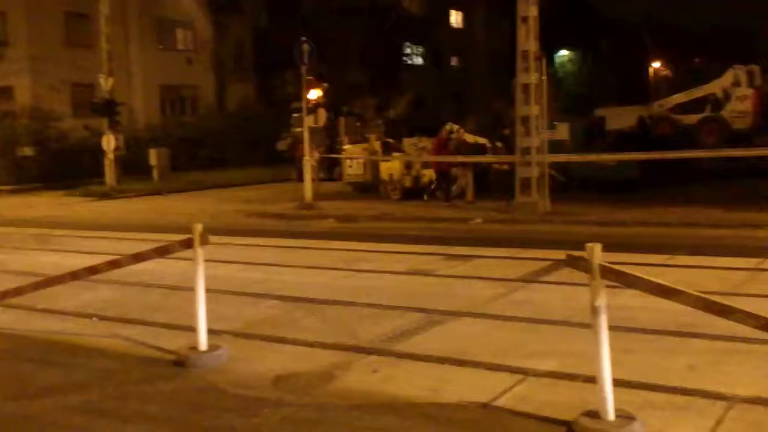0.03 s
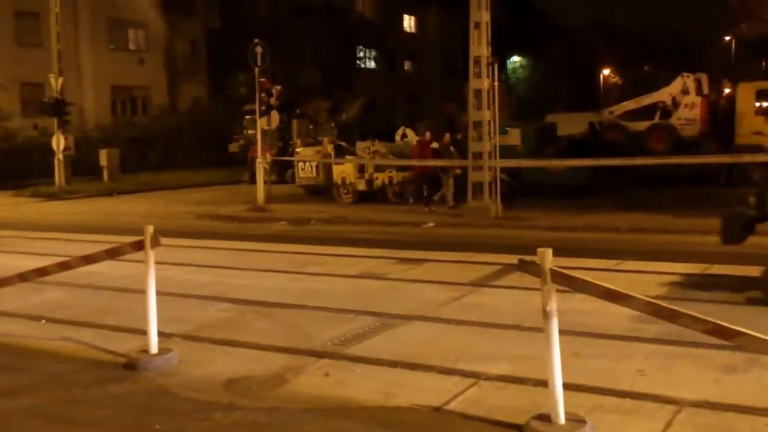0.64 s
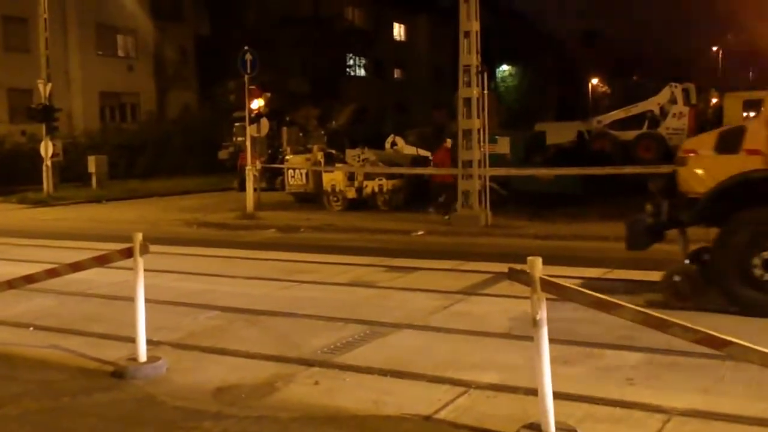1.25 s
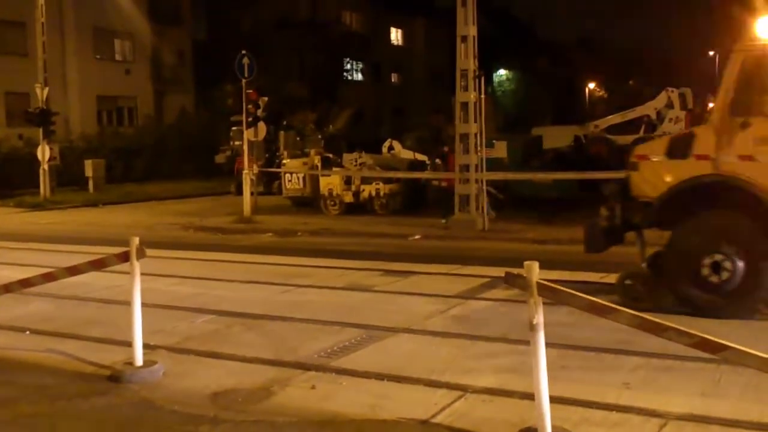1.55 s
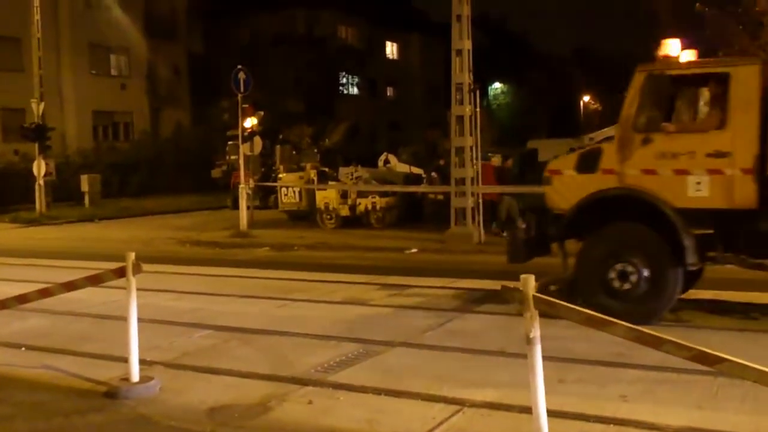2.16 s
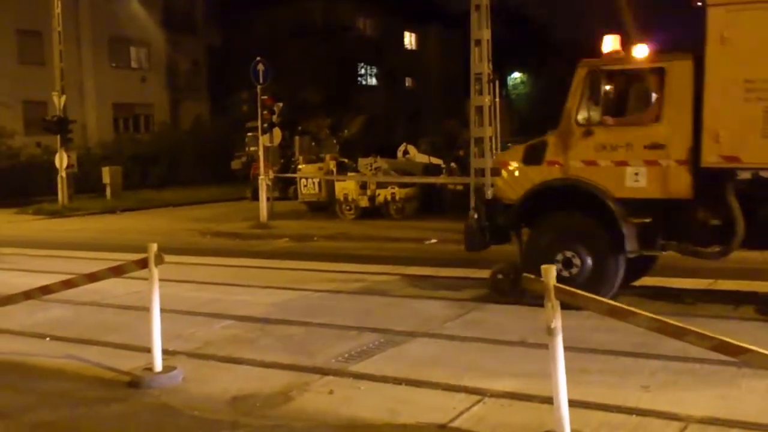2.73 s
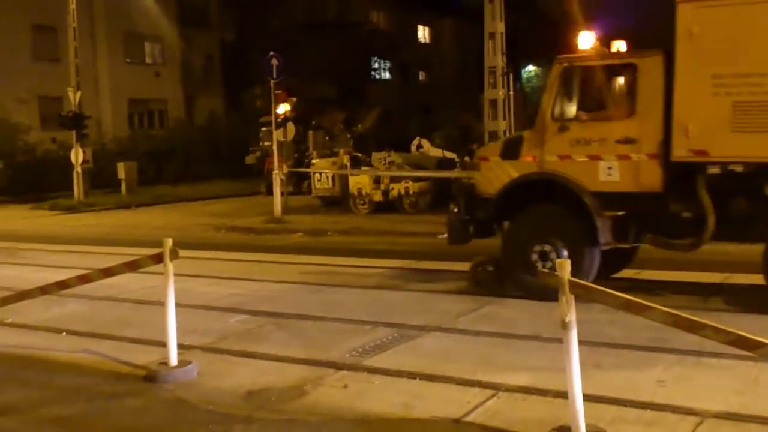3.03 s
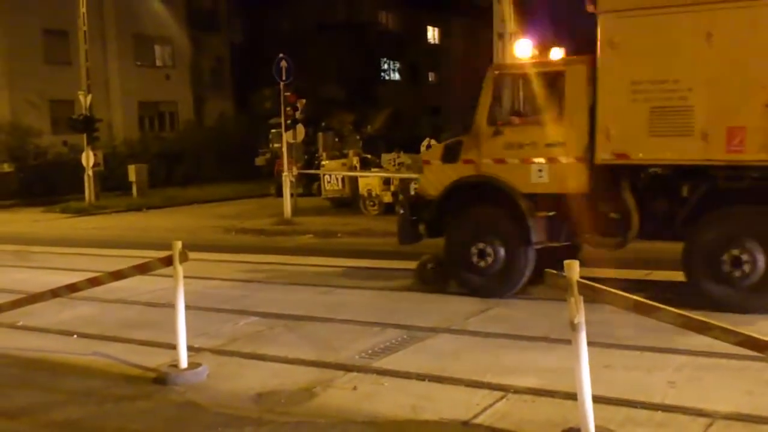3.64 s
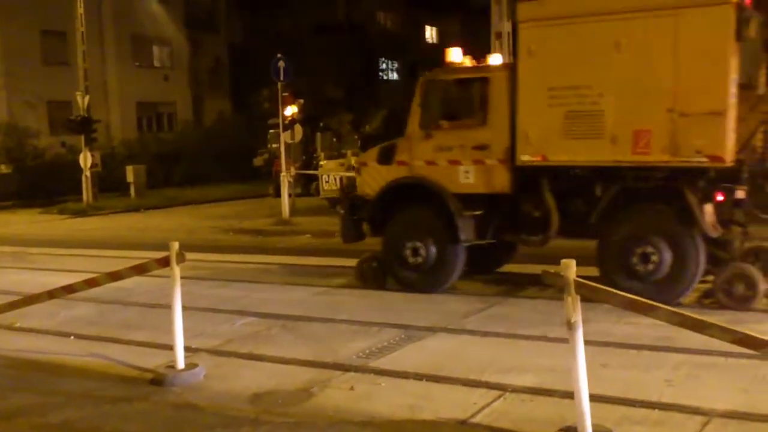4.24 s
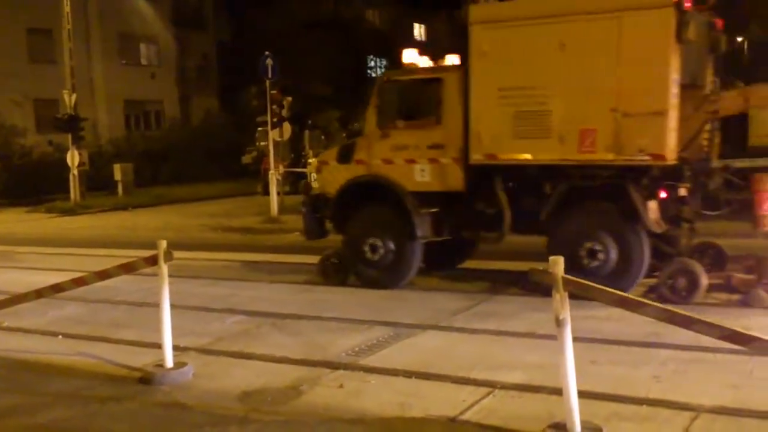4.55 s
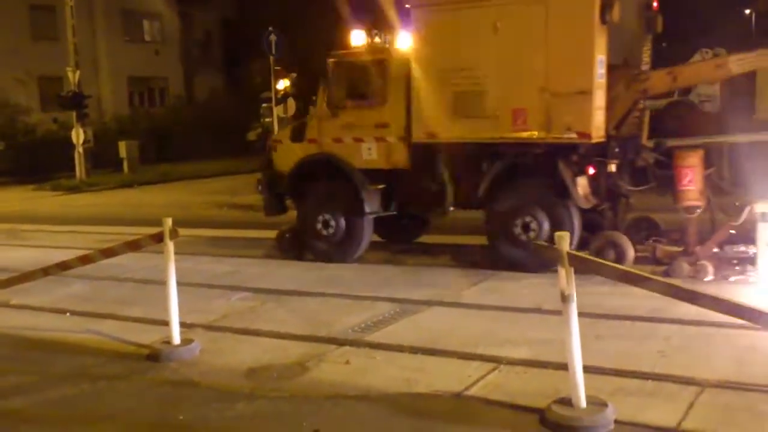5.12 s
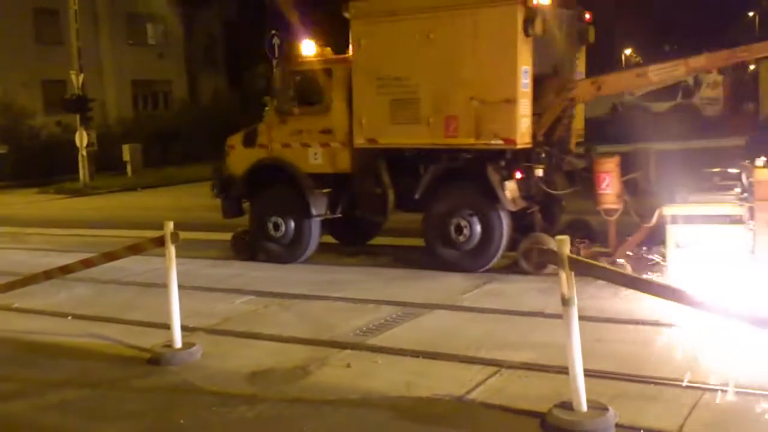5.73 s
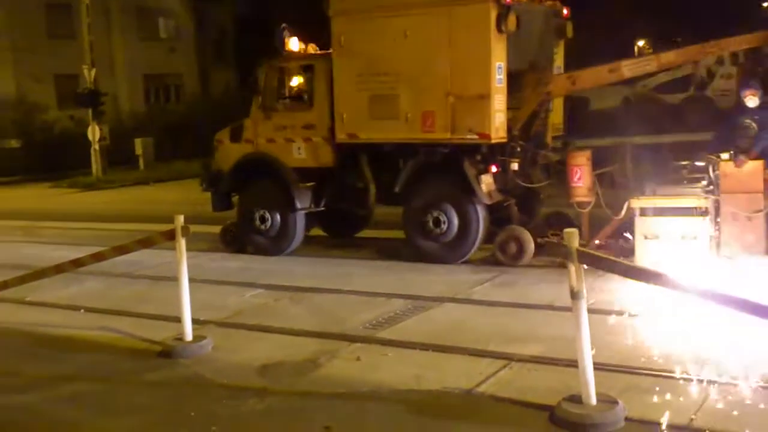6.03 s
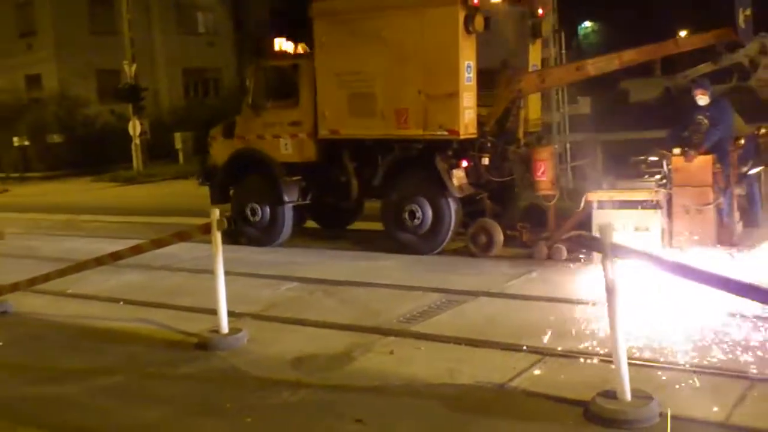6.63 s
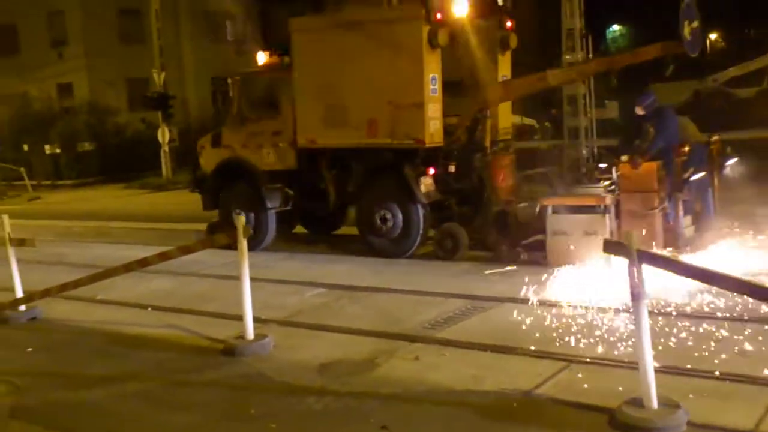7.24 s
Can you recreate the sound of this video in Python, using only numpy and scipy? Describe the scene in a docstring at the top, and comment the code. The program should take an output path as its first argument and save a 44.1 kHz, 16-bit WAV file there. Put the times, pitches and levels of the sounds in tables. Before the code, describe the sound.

Steady rail grinding with a gritty rasp, spark hiss, machine drone and brief squeals over a rumbling diesel truck and generator.

```python
"""Rail grinder on a night street

A diesel truck crawls along a tram line, towing a rail grinder that comes nearer from the right.
The truck and a generator throb. The grinder's spindles (spinning shafts) drone, their gears whine,
and their stones hiss and squeal on the rail. The sound cuts in at once, heard through two closely
spaced microphone ports (openings)."""
import sys
import numpy as np
from scipy import signal
from scipy.fft import rfft, irfft, next_fast_len
from scipy.io import wavfile
from scipy.ndimage import uniform_filter1d, map_coordinates

SR = 44100
rng = np.random.default_rng(int(sys.argv[2]) if len(sys.argv) > 2 else 0)


def persist_wave(psi):
    """Save psi, clipped to +-1, as 16-bit WAV."""
    counts = np.round(np.clip(psi, -1, 1) * 32767).astype(np.int16)
    wavfile.write(sys.argv[1], SR, np.atleast_2d(counts).T)


N = 321048


def amp(db):
    """Turn decibels into a gain to multiply by."""
    return 10 ** (np.asarray(db) / 20)


def unit(x):
    """Scale a signal so that its average power is 1."""
    return x / np.sqrt(np.mean(np.abs(x) ** 2) + 1e-20)


def along(points, hz):
    """Read between (frequency, value) points, giving every octave equal room."""
    freqs, values = np.transpose(points)
    return np.interp(np.log(hz + 1), np.log(freqs + 1), values)


def clock():
    """The time of each sample in seconds."""
    return np.arange(N) / SR


def curve(points):
    """Join (time, value) points with straight lines, one value per sample."""
    times, values = np.transpose(points)
    return np.interp(clock(), times, values)


def wobble(rate):
    """A smooth curve through `rate` random values a second."""
    knots = rng.standard_normal(4096)
    coarse_times = np.arange(0, N + 64, 64) / SR
    return np.interp(clock(), coarse_times, map_coordinates(knots, [coarse_times * rate], mode="wrap"))


def swell(peak_s, length_s, db):
    """A gain that rises to db at peak_s and dies away again, lasting length_s in all."""
    return amp(db) * np.cos(np.pi * np.clip((clock() - peak_s) / length_s, -.5, .5))


def filtered(x, response):
    """Multiply each frequency in x by the gain that response(hz) gives."""
    size = next_fast_len(N + 8192)
    return irfft(rfft(x, size) * response(np.fft.rfftfreq(size, 1 / SR)), size)[..., :N]


def angle(hz):
    """The growing angle of something that turns hz times a second."""
    return 2 * np.pi * np.cumsum(hz * np.ones(N)) / SR


def tone(phase, db):
    """A sine wave at level db, starting anywhere in its cycle."""
    return np.sqrt(2) * amp(db) * np.sin(phase + 2 * np.pi * rng.random())


def rush(spectrum, patchy_db):
    """Stereo noise of power 1 with drifting loud and soft patches; the ports agree less in the treble."""
    # how alike the two ports sound: f/Hz, likeness/0-1
    likeness = [(200, 0.98), (750, 1), (1250, 0.63), (2300, 0.57), (3300, 0.63), (7000, 0.09), (10000, 0.4),
                (14000, 0)]
    noise_grid = signal.stft(rng.standard_normal((2, N)), nperseg=1024)[2]
    patches = uniform_filter1d(rng.standard_normal(noise_grid.shape[1:]), size=4, axis=0)  # over pitch
    patches = uniform_filter1d(patches, size=24, axis=1)  # over time
    pair = signal.istft(noise_grid * amp(patchy_db * unit(patches)), nperseg=1024)[1][:, :N]
    spread = lambda hz: np.arccos(np.clip(along(likeness, hz), 0, 1)) / 2
    shares = lambda hz: [np.cos(spread(hz)), np.sin(spread(hz))]
    mid, side = filtered(pair, lambda hz: amp(along(spectrum, hz)) * shares(hz))
    return unit(np.array([mid + side, mid - side]))


def bearing():
    """The grinder's angle to the right of straight ahead as it rolls along a straight track."""
    speed_m_per_s, track_distance_m, straight_ahead_s = 1.23, 7.02, 7.97
    return np.arctan(speed_m_per_s * (straight_ahead_s - clock()) / track_distance_m)


def approaching(closest_db, growth):
    """A level that moves towards closest_db as the grinder nears: up if growth is positive, else down."""
    nearness_db = 20 * np.log10(np.cos(bearing()))
    return closest_db + growth * nearness_db


def arriving(pair, lag_ms):
    """Sound from the right reaches the left port a little later."""
    lag = lag_ms * SR / 1000
    return np.array([map_coordinates(pair[0], [np.arange(N) - lag], order=5), pair[1]])


def street_echoes(x, path_m, shrink_m_per_s, echo_db):
    """The truck's side and the paving return four weak echoes, whose paths slowly shorten."""
    mix = x.copy()
    for path_share, shrink_share in rng.uniform(.3, 1, (4, 2)):
        extra_m = path_m * path_share - shrink_m_per_s * shrink_share * clock()
        delay = extra_m * SR / 343  # sound travels 343 m/s
        echo = np.array([map_coordinates(port, [np.arange(N) - delay], order=3) for port in x])
        mix += amp(echo_db) * echo
    return mix / np.sqrt(1 + 4 * amp(echo_db) ** 2)


def exhaust(orders, shaft, waver_db):
    """Slightly unsteady exhaust tones; a tone's order is its number of cycles per turn of the shaft."""
    return sum(tone(order * shaft + 0.1 * wobble(6.8), db + waver_db * wobble(1.86))
               for order, db in orders)


def engines():
    """Truck and generator hold their speeds; burning fuel rumbles in time with the firings; a fan hums."""
    # tones of the truck's six cylinders, firing on order 3: order, level/dB
    truck_orders = [(2, -57), (3, -38), (4, -47), (6, -44.5), (7, -54), (10, -49.5), (11, -44.5), (12, -42),
                    (15, -47), (16, -48.5)]
    # tones of the generator's four cylinders, firing on order 2: order, level/dB
    generator_orders = [(2, -41), (4, -40.5), (5, -42.5), (6, -41.5), (8, -44.5), (9, -51)]
    # noise of the burning fuel: f/Hz, level/dB
    rumble_spectrum = [(14, -30), (28, -9), (38, -2.5), (55, -5.5), (75, -8), (95, -10.5), (120, -2.5),
                       (170, -3.5), (240, -2), (285, -9), (340, -8), (430, -11), (650, -48)]
    # hum of the truck's fan: t/s, level/dB
    fan_levels = [(.6, -35.5), (1.2, -38.5), (1.7, -35), (2.8, -32.5), (3.6, -37.5), (4.85, -34),
                  (5.9, -38), (6.7, -34), (7.28, -34)]
    truck_shaft = angle(hz=14.22 + 0.015 * wobble(0.91))
    generator_shaft = angle(hz=27.56 + 0.025 * wobble(0.95))
    firings = np.cos(3 * truck_shaft) + np.cos(2 * generator_shaft)
    throb = unit(1 + 0.12 * firings)
    rumble = amp(-30.5 + .4 * wobble(2.2)) * throb * rush(rumble_spectrum, patchy_db=-0.5)
    fan = tone(angle(hz=323.4 + 0.87 * wobble(3)), curve(fan_levels) + 1.2 * wobble(5.4))
    # the exhaust booms briefly as the truck passes closest
    boom = swell(peak_s=4.12, length_s=0.84, db=-30.5) * tone(9 * truck_shaft + wobble(8), db=0)
    truck = amp(-0.1) * exhaust(truck_orders, truck_shaft, waver_db=0)
    generator = exhaust(generator_orders, generator_shaft, waver_db=2.5)
    return rumble + fan + boom + truck + generator


def fluttering_notes():
    """Fluttering notes swell and die away: stones squealing on steel and swelling spindle overtones."""
    # one note a row: peak t/s, length/s, f/Hz, relative level/dB
    notes = [(1.18, 0.75, 1000, -42), (1.6, 1.4, 893, -42.5), (3.46, 0.82, 1382, -45),
             (3.408, 3.5, 2178, -47), (4.2, 0.62, 1903, -44.5), (4.203, 0.83, 700, -38.5),
             (4.75, 0.78, 1514, -43), (5.45, 1.1, 2416, -47), (5.718, 0.55, 2246, -39.5),
             (5.966, 0.15, 2246, -36), (6.004, 0.32, 876, -36), (6.076, 0.15, 2246, -36),
             (6.26, 0.11, 2230, -39), (6.2, 3.6, 1125, -47), (6.3, 1.4, 1251, -45.5), (6.8, 2.6, 654, -42),
             (7.15, 1.5, 499, -38)]
    return sum(swell(peak_s, length_s, db) * tone(angle(hz + 4.5 * wobble(40)), 4.6 + 2.2 * wobble(20))
               for peak_s, length_s, hz, db in notes)


def gears_and_rail(turn):
    """Gear whines of two spindles surge and beat against each other; the rail rings under the stones."""
    # surges of the gear whine: peak t/s, length/s, relative level/dB
    surges = [(0.753, .36, -40), (1.723, .4, -42), (2.72, 0.22, -38), (3.376, 0.37, -32.5),
              (3.85, 0.7, -31.5), (4.4, 0.77, -33), (4.973, 0.54, -31), (5.53, 0.39, -29),
              (5.977, .35, -33), (6.5, .5, -39.5), (6.85, 0.33, -38), (7.22, .25, -42)]
    whine_gain = amp(-44.5) + sum(swell(*row) for row in surges)
    ring_flare = swell(peak_s=1.49, length_s=.22, db=-39)
    ring_gain = amp(approaching(-48, growth=-1.17)) + ring_flare
    flutter_db = lambda: 2.1 * wobble(28)
    mesh = 26.5 * turn  # gear teeth meet 26.5 times a turn
    slip = angle(hz=-12 + 14 * wobble(7))  # the second whine is mostly a little lower
    first_whine = tone(mesh + .5 * wobble(45), -5.5 + flutter_db())
    second_whine = tone(mesh + slip + .5 * wobble(45), -14 + flutter_db())
    ring = tone(angle(hz=4535 + 20 * wobble(110)), 3.7 * wobble(35))
    upper_ring = tone(angle(hz=6640 + 60 * wobble(200)), -3 + flutter_db())
    return whine_gain * (first_whine + second_whine) + ring_gain * (ring + upper_ring)


def stones():
    """Stones scrape the rail, grainy with torn-off grit. Returns the scraping and the sparks' hiss."""
    # how hard the stones bite, as the loudness of their rasp: t/s, relative level/dB
    bite_levels = [(.6, -35.5), (1.3, -34.5), (1.8, -32.5), (3.4, -31.5), (4.2, -32), (4.9, -31),
                   (5.2, -31.5), (6, -31), (7.28, -33.5)]
    # low roar of the grinder's body: f/Hz, level/dB
    roar_spectrum = [(330, -45), (450, -11), (520, -8.5), (580, -4.5), (640, -2), (720, -2), (810, -3),
                     (900, -5.5), (1000, -7.5), (1100, -11), (1400, -11), (2100, -48)]
    # rasp of stone on steel: f/Hz, level/dB
    rasp_spectrum = [(950, -63), (1400, -2), (1800, 1), (2100, -0.5), (2300, 2), (2600, -1), (3000, -4.5),
                     (3600, -3.5), (4100, -6), (5600, -45)]
    # hiss of the sparks: f/Hz, level/dB
    hiss_spectrum = [(3000, -18), (4100, -5.5), (4600, -3.5), (5300, -6), (6600, -2.5), (7100, -5),
                     (8200, -3), (9100, -2.5), (10300, -4.5), (11700, -14), (14000, -35)]
    # highest fizz of the sparks: f/Hz, level/dB
    fizz_spectrum = [(8000, -39), (11300, 2), (12800, -1), (15000, -6.5), (15800, -12)]
    bite_db = curve(bite_levels)
    effort_db = bite_db - bite_db.mean()
    chatter = amp(0.61 * wobble(30))
    grit = unit(amp(0.57 * wobble(500)))
    roar = amp(approaching(-27.6, growth=0.44) + 0.11 * effort_db) * rush(roar_spectrum, patchy_db=1.26)
    rasp = amp(bite_db - 0.35) * rush(rasp_spectrum, patchy_db=2.0)
    hiss = amp(approaching(-30, growth=-0.65) + 0.13 * effort_db) * rush(hiss_spectrum, patchy_db=1.67)
    fizz = amp(approaching(-39, growth=-0.5)) * rush(fizz_spectrum, patchy_db=2.8)
    return chatter * (roar + grit * rasp), chatter * grit * (hiss + fizz)


def spindles(turn):
    """The spindles drone at multiples of their speed; street echoes make each tone fade on its own."""
    # brief dips in the hum on order 3: t/s, depth/dB
    hum_dips = [(1.93, 10), (2.5, 7), (3.95, 9), (5.87, 4)]
    # the main drone on order 6: t/s, level/dB
    drone_levels = [(.6, -34), (1.3, -31.5), (1.6, -35.5), (2.15, -30.5), (2.95, -36.5), (3.65, -26),
                    (4.05, -28.5), (4.75, -30.5), (5.25, -22.5), (5.55, -30), (6.7, -32), (7.03, -30),
                    (7.28, -50)]
    # weaker spindle tones: order, relative level/dB
    weak_orders = [(1, -37.5), (2, -43.5), (4, -44.5), (7, -40.5), (8, -48), (9, -47), (10, -45.5),
                   (11, -47), (12, -50), (15, -48.5), (16, -49.5), (18, -44.5), (19, -52)]
    dip_db = sum(depth * swell(time, length_s=0.44, db=0) for time, depth in hum_dips)
    hum_db = approaching(-34.5, growth=-0.4) - dip_db
    hum = tone(3 * turn + .2 * wobble(15), hum_db + .9 * wobble(11))
    strong_tone = lambda order, db: tone(order * turn + .36 * wobble(24), db + 1.3 * wobble(16))
    growing_drone = strong_tone(order=5, db=approaching(-34, growth=2.3) + 3.1 * wobble(2.91))
    main_drone = strong_tone(order=6, db=curve(drone_levels))
    weak_tones = 0
    for order, db in weak_orders:
        fading_db = approaching(-0.6, growth=0.45) + 2.8 * wobble(3.5)
        weak_tones += tone(order * turn + 0.73 * wobble(16), db + fading_db)
    return hum + growing_drone + main_drone + weak_tones


def scene():
    """The grinder rolls in from the right, its body ahead of the trailing sparks."""
    # spindle speed, sagging under load: t/s, turning rate/Hz
    spindle_speeds = [(0.6, 126.8), (1.2, 125.3), (2.2, 127.3), (3.1, 126.0), (3.65, 127.0), (4.05, 126.3),
                      (4.45, 126.7), (4.9, 125.5), (5.75, 124.8), (6.4, 125.2), (7.25, 126.9)]
    turn = angle(curve(spindle_speeds))
    lag_ms = 0.311 * np.sin(bearing())  # shrinks as the grinder nears the middle
    scraping, hiss = stones()
    body = arriving(scraping + spindles(turn) + fluttering_notes(), 0.51 * lag_ms)
    echoing_hiss = street_echoes(hiss, path_m=4, shrink_m_per_s=0.0074, echo_db=-15.5)
    sparks_and_whines = arriving(echoing_hiss + gears_and_rail(turn), lag_ms)
    return engines() + body + sparks_and_whines


def gain_control(x, target_db):
    """An automatic volume knob pulls the short-term level part of the way to a steady target."""
    window_s, pull = 0.035, 0.55
    power = np.abs(uniform_filter1d(np.mean(x ** 2, axis=0), size=int(window_s * SR)))
    level_db = 10 * np.log10(power + 1e-6)
    return x * amp(pull * (target_db - level_db))


def record(dry):
    """The ports colour the sound by direction; its level is evened out and the highest treble is cut."""
    # sound from the side: f/Hz, left minus right level/dB
    side_balance = [(330, -2.2), (800, 0.2), (1200, 1.3), (1800, -3.5), (2300, 1.5), (2900, 12), (3900, 5),
                    (5400, 6.5), (6600, 9), (7700, 4.5), (9000, 5.5), (10500, -1), (13000, -4.5),
                    (15500, 5)]
    # sound from the front: f/Hz, left minus right level/dB
    front_balance = [(330, -2.0), (800, -1), (1200, 3.5), (1800, -2.5), (2300, 5), (2900, 12), (3900, 5),
                     (5400, 5), (6600, 12), (7700, 7), (9000, 3), (10500, -2.5), (13000, -3.5), (15500, -2)]
    start_s, top_hz = 0.607, 15750
    split = np.array([[.5], [-.5]])  # half the difference to each port
    ports = lambda balance: filtered(dry, lambda hz: amp(along(balance, hz) * split))
    front_share = np.interp(clock(), [2.2, 5.8], [0, 1])
    heard = (1 - front_share) * ports(side_balance) + front_share * ports(front_balance)
    evened = gain_control(heard, target_db=-21)
    switched_on = clock() >= start_s
    return filtered(evened * switched_on, lambda hz: 1 / (1 + (hz / top_hz) ** 300))


dry = scene()
out = record(dry)
persist_wave(out)
```